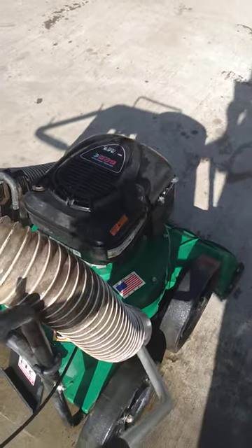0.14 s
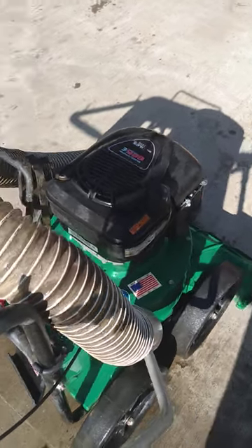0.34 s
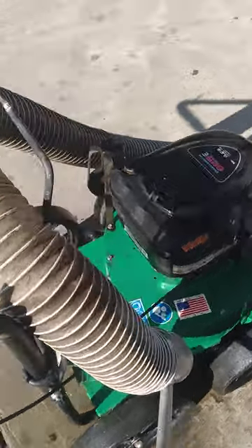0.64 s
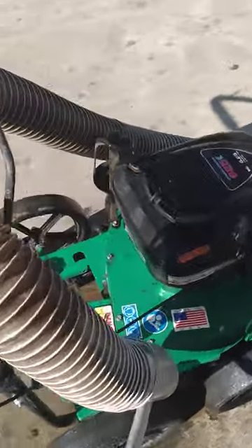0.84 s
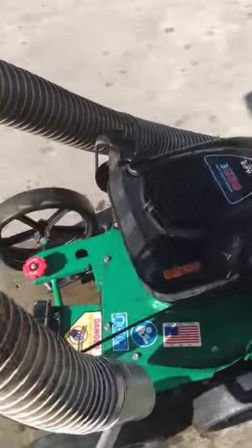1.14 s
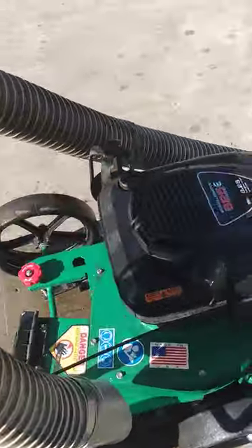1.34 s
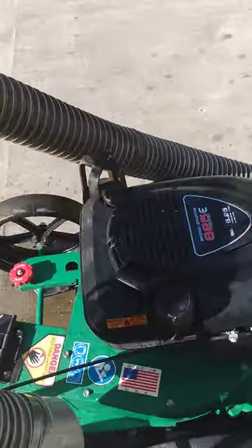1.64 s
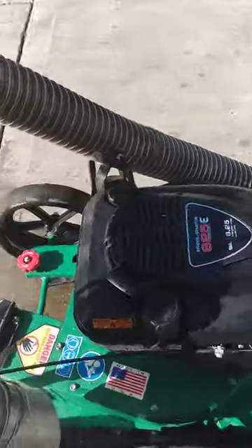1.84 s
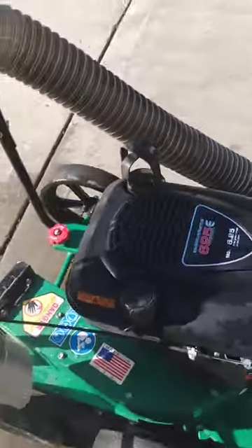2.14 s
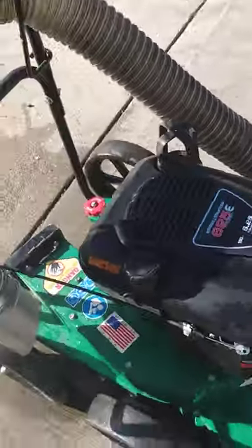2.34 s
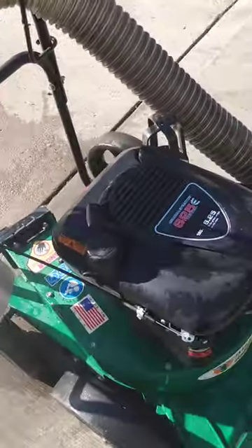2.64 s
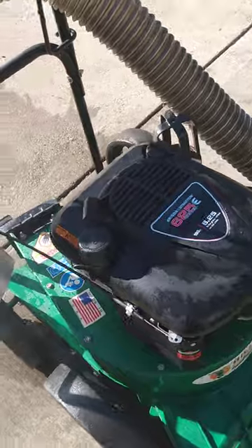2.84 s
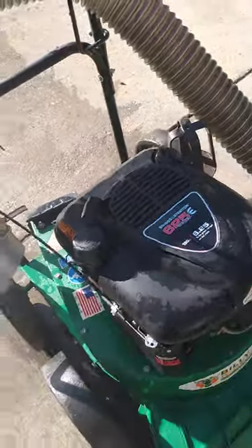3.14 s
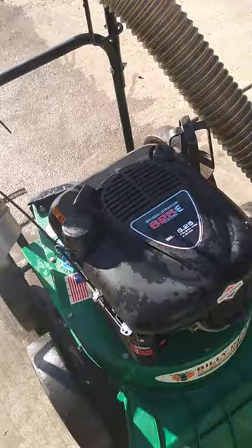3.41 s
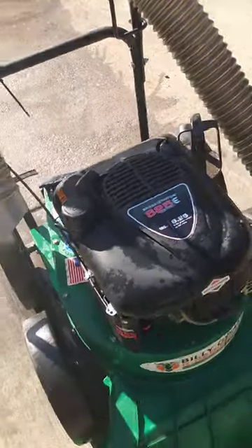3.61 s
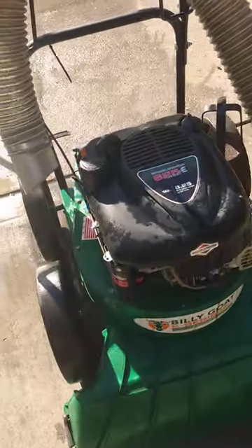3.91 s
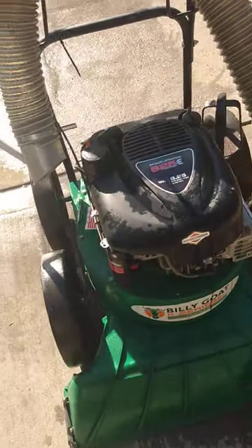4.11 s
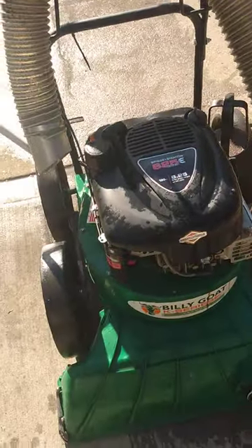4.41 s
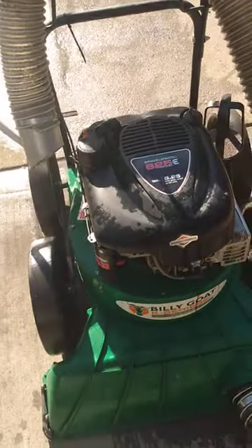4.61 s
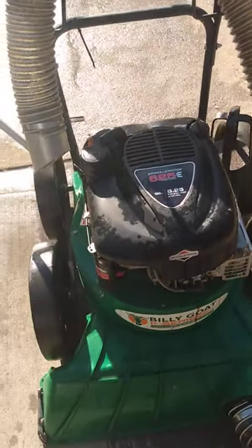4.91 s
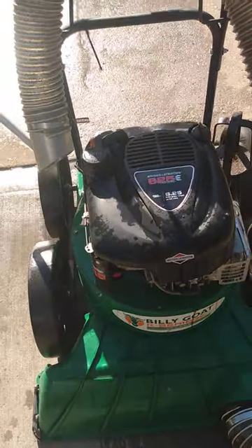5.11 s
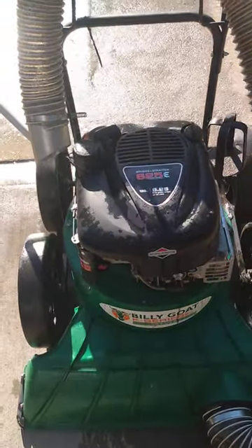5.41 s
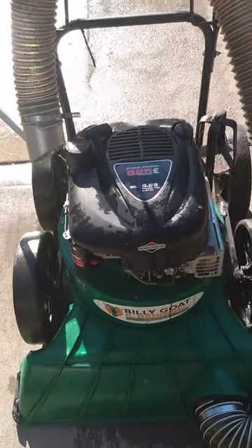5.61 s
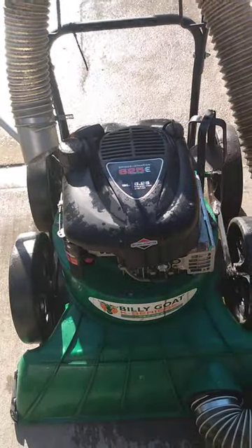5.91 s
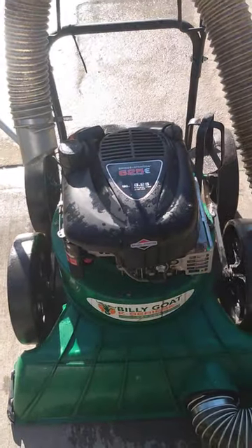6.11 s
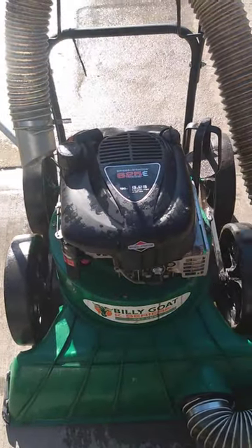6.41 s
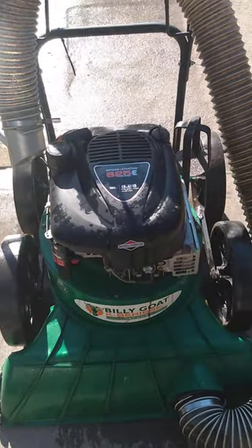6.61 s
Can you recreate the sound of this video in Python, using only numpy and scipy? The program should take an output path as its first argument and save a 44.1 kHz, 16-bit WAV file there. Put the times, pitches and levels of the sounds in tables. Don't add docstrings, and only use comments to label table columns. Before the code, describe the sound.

A leaf vacuum's small petrol engine, ignition just cut, coasts down very close by outdoors on concrete. From 0 s a low, wavering fan hum of nearly 190 Hz sits in rumble, housing roar and a broad airy hose rush, with valve thumps and short hisses at about 19 a second. Pitch, roar and pulse rate fall smoothly; around 1.7 s the airy valve sounds come nearer as the handheld microphone walks round, image slightly left. By 3 s the thumps separate, about nine a second. At 3.6 s a steel clack snaps with a dull pop and short rattle. Afterwards each cycle gives a hollow pop, crisp spit, chuff and brief frothy gurgle, with irregular low hose gulps, slowing from eight to about three a second by 6.7 s. The fan hum is nearly gone by then; faint steady yard hiss remains, the machine still turning at the end.

```python
import sys
import numpy as np
from scipy import signal
from scipy.fft import rfft, irfft
from scipy.io import wavfile
from scipy.ndimage import uniform_filter1d, map_coordinates

SR = 44100
rng = np.random.default_rng(int(sys.argv[2]) if len(sys.argv) > 2 else 0)


def waveform_to_disk(signal):
    frames = np.transpose(np.atleast_2d(signal))
    scaled = np.clip(frames, -1, 1) * 32767
    samples = np.round(scaled).astype(np.int16)
    wavfile.write(sys.argv[1], SR, samples)


def decibels_to_gain(level_db):
    exponent = np.asarray(level_db, float) / 20
    return 10 ** exponent


N = 297656
TIME_S = np.arange(N) / SR
RELEASE_S = 3.638

# [t/s, speed/rpm]
SPEED_RPM = [(0.0, 2269.0), (0.6, 1935.0), (1.2, 1687.0), (1.8, 1462.0), (2.4, 1275.0), (3.0, 1105.0),
             (3.6, 958.0), (4.2, 828.0), (4.8, 708.0), (5.4, 599.0), (6.0, 490.0), (6.75, 381.0)]
# [t/s, nearness to open side/dB, left over right/dB, left lag/us]
WALK = [(0, 1.5, 2.5, 20), (.3, .3, 2, 38.5), (.8, 2.4, 2.5, 52), (1.3, 2.5, 2, 65), (1.75, 9, 2, 83.5),
        (2.2, 8.5, 2.5, 102), (2.7, 8.5, 1.8, -110), (3.2, 7, 2, -110), (3.7, 7.5, 2.5, 38),
        (4.15, 4.5, 4, -30), (4.7, 5, 2.5, -21), (5.2, 5, 3, 11), (5.9, 5.5, 2.5, -20),
        (6.75, 6.5, 3.5, -46)]
# [f/Hz, level/dB]
HOSE_RUSH = [(900, -11), (1400, -1), (2000, 3), (2600, 0), (3100, -8.5), (4300, -15.5), (5500, -20.5),
             (8000, -26.5)]
# [f/Hz, width/Hz, level/dB]
SHELL_MODES = [(255, 25, -38), (320, 25, -39), (430, 20, -36), (495, 22, -34), (770, 40, -36),
               (1050, 40, -40)]


def unit(x):
    return x / np.sqrt(np.mean(x ** 2) + 1e-20)


def along(points, hz):
    f, v = np.transpose(points)
    return np.interp(np.log(hz + 1), np.log(f + 1), v)


def curves(rows):
    s, *cols = np.transpose(rows)
    return [np.interp(TIME_S, s, c) for c in cols]


def wobble(rate_hz):
    knots = rng.standard_normal(int(N * rate_hz / SR) + 4)
    return map_coordinates(knots, [np.arange(N) * rate_hz / SR])


def rush(gain, patchy_db=2.2):
    # [f/Hz, correlation]
    alike = [(40, 0.13), (70, 0.3), (150, 0.88), (380, 0.95), (950, 0.43), (2400, 0.11), (6000, 0.076),
             (15000, 0.083)]
    z = signal.stft(rng.standard_normal((2, N)), nperseg=512)[2]
    field = uniform_filter1d(rng.standard_normal(z.shape[1:]), size=5, axis=0)
    field = uniform_filter1d(field, size=6, axis=1)
    pair = signal.istft(z * decibels_to_gain(patchy_db * unit(field)), nperseg=512)[1][:, :N]
    hz = np.fft.rfftfreq(N, 1 / SR)
    turn = np.arccos(np.clip(along(alike, hz), -1, 1)) / 2
    mid, side = irfft(rfft(pair) * gain(hz) * [np.cos(turn), np.sin(turn)], N)
    return unit(np.array([mid + side, mid - side]))


def shaped(spectrum):
    below, above = (spectrum[0][0] / 2, -120), (spectrum[-1][0] * 2, -120)
    return lambda hz: decibels_to_gain(along([below, *spectrum, above], hz))


def peaks(modes, hz):
    return sum(decibels_to_gain(db) * w * hz / np.hypot(c * c - hz * hz, hz * w) for c, w, db in modes)


def cycle():
    start_cycles = -.2526
    return start_cycles + np.cumsum(curves(SPEED_RPM)[0]) / 120 / SR


def slowing():
    rpm, = curves(SPEED_RPM)
    speed_db = 20 * np.log10(rpm / rpm[0])
    return speed_db, np.minimum(speed_db - speed_db[round(RELEASE_S * SR)], 0)


def law(*names):
    # [full-speed level/dB, speed slope/(dB/dB), nearness slope/(dB/dB),
    # step at the snap/dB, added speed slope after it/(dB/dB)]
    laws = dict(rumble=(-31, 1.55, 0.66, -1.2, 0.17), roar=(-36, 1.33, 0.6435, -0.6, 0.1),
            hose=(-39, 1.43, 0.9752, 0.7, 0.24), hiss=(-54, 0.7, 1.08, 4.5, 1.8),
            exhaust=(-36, -0.46, 1.33, 2.6, 1.2), intake=(-38, -0.1, 1.26, -0.5, 3),
            puff=(-45.5, -0.04, 0.75, -1.5, 3), breath=(-50.5, 0.03, 0.12, .3, 2.1),
            deck=(-69, -0.17, 2.5, -0.8, 2.2), cowl=(-56, 1.4, 0.1, 3, -1.54))
    speed_db, since_db = slowing()
    drives = np.array([np.ones(N), speed_db, curves(WALK)[0], since_db < 0, since_db])
    return [np.dot(laws[name], drives) for name in names]


def stroke(turns, at, rise, fall, spread_db=1.2):
    u = (turns - at + .5) % 1 - .5
    size = decibels_to_gain(spread_db * rng.standard_normal(80))[np.floor(turns - at + 1.5).astype(int)]
    return size * np.exp(-.5 * (u / np.where(u < 0, rise, fall)) ** 2)


def passes(turns, at, db, spread_db=1.2):
    marks = np.zeros(N)
    where = np.flatnonzero(np.diff(np.floor(turns - at)))
    marks[where] = decibels_to_gain(db[where] + spread_db * rng.standard_normal(80)[:len(where)])
    return marks


def thump(marks, hz, cycles, lean_rad):
    t = np.arange(-1500, 1501) / SR
    swing = np.cos(2 * np.pi * hz * t + lean_rad) * np.exp(-.5 * (t * hz / cycles) ** 2)
    return signal.fftconvolve(marks, swing, "same")


def yard():
    # [f/Hz, level/dB]
    yard_hiss = [(1760, -32), (3000, -3), (4160, 0), (8140, -12), (11800, -10.5), (15100, -16),
                 (15900, -20)]
    return decibels_to_gain(-61.2) * rush(shaped(yard_hiss))


def panels():
    panel_hz = (758.5, 1051)
    sound = 0
    for hz, db in zip(panel_hz, law("deck", "cowl")):
        tone = np.sin(2 * np.pi * np.cumsum(hz + 6 * wobble(30)) / SR)
        sound = sound + np.sqrt(2) * decibels_to_gain(db + wobble(18)) * tone
    return sound


def gulps():
    # [t/s, level/dB, push 1 or pull -1]
    gulp_events = [(3.45, -28, 1), (3.588, -22, -1), (3.597, -20, 1), (4.122, -22, -1), (4.169, -23.5, 1),
                   (4.251, -23, 1), (4.259, -21.5, 1), (4.394, -24, 1), (4.726, -27, -1), (4.916, -25, 1),
                   (5.051, -34, 1), (5.075, -29, 1), (5.198, -29, 1), (5.911, -44, 1), (6.411, -27, 1),
                   (6.495, -30, -1), (6.528, -29, 1), (6.735, -34, -1)]
    s, db, way = np.transpose(gulp_events)
    marks = np.zeros(N)
    marks[np.round(s * SR).astype(int)] = decibels_to_gain(db) * np.sign(way)
    return thump(marks, hz=110, cycles=0.37, lean_rad=.4)


def clack():
    # [f/Hz, level/dB]
    crack_spectrum = [(240, -36), (400, -23), (752, -8.5), (1480, -9), (2280, 0), (3460, -12), (4290, -8.5),
                      (4780, -13.5), (5160, -16.5), (14700, -19), (15900, -25)]
    # [f/Hz, level/dB, t60/s]
    lever_modes = [(725, 6.5, 0.042), (2080, 0.5, 0.11), (2680, -17, 0.25), (4200, -7, 0.11),
                   (4670, -25, 5.0)]
    t = np.maximum(TIME_S - RELEASE_S, 0)
    start = 1 - np.exp(-t / 0.00052)
    ring = sum(decibels_to_gain(db - 60 * t / min(t60, .08)) * np.sin(2 * np.pi * hz * t) for hz, db, t60 in lever_modes)
    decay = decibels_to_gain(-17.0 - 60 * t / 0.039) + decibels_to_gain(-22.0 - 60 * t / 0.2)
    rattle_db = 2.4 * wobble(500)
    steel = rush(shaped(crack_spectrum), patchy_db=0) * decibels_to_gain([[1.2], [-1.2]] + rattle_db)
    mark = np.zeros(N)
    mark[round(3.631 * SR)] = decibels_to_gain(-15)
    return start * (decibels_to_gain(-21.5) * ring + decay * steel) + thump(mark, hz=180, cycles=0.36, lean_rad=1.1)


def gurgle(turns, level_db):
    # [f/Hz, wander/Hz, level/dB]
    throat = [(400, 22, -4), (805, 35, 0)]
    froth = .4
    sound = 0
    for (hz, wander_hz, db), at, fall in zip(throat, (.765, .725), (.07, .04)):
        phase = 2 * np.pi * np.cumsum(hz + wander_hz * wobble(120)) / SR
        bubbles = rush(lambda f: peaks([(hz, 220, 0)], f) ** 2, patchy_db=0)
        voice = (1 - froth / 2) * np.sin(phase) + froth * bubbles
        swell = stroke(turns, at, 0.019, fall, spread_db=0)
        sound = sound + decibels_to_gain(level_db + db + 3.5 + 2.2 * wobble(200)) * swell * voice
    return sound


def release(turns):
    # [level at the snap/dB, speed slope/(dB/dB), offset until the lifter seats/dB]
    open_laws = dict(pop=(-22, .45, 3.5), spit=(-30.5, 2.92, -9.5), chuff=(-34.5, 1.54, -6),
                 gurgle=(-35, 0.6, -14.5))
    # [f/Hz, level/dB]
    spit_spectrum = [(600, 1.5), (1300, 2.5), (2200, -11), (3200, -3.5), (4800, -2), (7000, -12.5),
                     (12000, -13), (16000, -17)]
    seat_s = .55
    seating = np.exp(-abs(TIME_S - RELEASE_S) / seat_s)
    since_db = slowing()[1]
    levels = [db + slope * since_db + lack_db * seating for db, slope, lack_db in open_laws.values()]
    pop_db, spit_db, chuff_db, gurgle_db = levels
    on = TIME_S > RELEASE_S + .06
    marks = passes(turns, .538, pop_db, spread_db=0) * on
    pop = thump(marks, hz=169.0, cycles=0.48, lean_rad=1.5)
    echo = thump(marks, hz=103, cycles=0.68, lean_rad=0.47)
    pop += 0.29 * np.roll(echo, round(0.0103 * SR))
    spit = stroke(turns, 0.526, 0.017, 0.034, spread_db=0)
    spit += 0.29 * stroke(turns, 0.532, 0.042, 0.22, spread_db=0)
    spit *= decibels_to_gain(spit_db + 3.5 + 2.7 * wobble(420))
    chuff = decibels_to_gain(chuff_db + 2.5 * wobble(180)) * stroke(turns, 0.54, rise=.085, fall=.075)
    air = spit * rush(shaped(spit_spectrum), patchy_db=1.0) + chuff * rush(shaped(HOSE_RUSH))
    return pop + on * (air + gurgle(turns, gurgle_db))


def valves(turns):
    # [f/Hz, level/dB]
    puff_spectrum = [(3500, 4.5), (5000, 3.5), (6000, -0.5), (8000, -2.5), (11000, -2.5), (13500, -4.5),
                     (15800, -11)]
    # [f/Hz, level/dB]
    breath_spectrum = [(3500, -2), (5000, 2), (7500, -6.5), (9500, -1), (10800, 0.5), (12500, -1.5),
                       (15800, -3.5)]
    out_db, in_db, puff_db, breath_db = law("exhaust", "intake", "puff", "breath")
    cycles_hz = np.gradient(turns) * SR
    exhaust = thump(passes(turns, .797, out_db), hz=94.6, cycles=0.35, lean_rad=-.35)
    exhaust = np.roll(exhaust, round(.0105 * SR))
    intake = thump(passes(turns, 0.1313, in_db), hz=128, cycles=0.58, lean_rad=1.1)
    short = 0.015 + 0.0024 * cycles_hz
    puff = decibels_to_gain(puff_db) * stroke(turns, 0.011, short, 1.55 * short)
    breath = stroke(turns, 0.22, 0.046, 0.15)
    breath += .5 * stroke(turns, .39, 0.01, .015)
    breath += 0.23 * stroke(turns, 1.0, .015, 0.075)
    breath += .42 * np.sqrt(cycles_hz / 19)
    breath *= decibels_to_gain(breath_db + .7 * wobble(200))
    return exhaust + intake + puff * rush(shaped(puff_spectrum)) + breath * rush(shaped(breath_spectrum))


def hose_colour(hz):
    # [f/Hz, width/Hz, level over the rush/dB]
    pipe_modes = [(1980, 23, -8), (2550, 48, -23), (4220, 87, 3.5)]
    return shaped(HOSE_RUSH)(hz) * (1 + .5 * peaks(pipe_modes, hz))


def draught(turns):
    # [f/Hz, level/dB]
    rumble_spectrum = [(15, -44), (25, -23), (59, -2.5), (86, -8), (157, -3), (267, -7), (408, -10.5),
                       (454, -14.5), (600, -22.5), (780, -37), (1320, -120)]
    # [f/Hz, level/dB]
    housing_roar = [(250, -14), (400, -11.5), (500, -4), (600, -3), (800, -2), (1050, -5), (1400, -13),
                    (2200, -31)]
    # [f/Hz, level/dB]
    hiss_spectrum = [(1760, -21), (3000, 13), (4340, 12), (5100, 2), (5510, -22), (6600, -13), (10500, -10),
                     (13300, -25.5), (15900, -33)]
    rumble_db, roar_db, hose_db, hiss_db = law("rumble", "roar", "hose", "hiss")
    eddy = wobble(35)
    beat = np.cos(2 * np.pi * (turns - .1))
    chug_db = 4 * np.cos(2 * np.pi * (turns - .97))

    rumble_db = rumble_db + 3.5 + .65 * chug_db + 1.5 * wobble(45)
    rumble_db += 0.91 * np.cos(2 * np.pi * (2 * turns - .1))
    rumble = decibels_to_gain(rumble_db) * rush(shaped(rumble_spectrum), patchy_db=0)

    deck_db = -37.5 - 1.1 * TIME_S + 2.5 * wobble(11) + chug_db
    deck = decibels_to_gain(deck_db) * rush(lambda f: peaks([(62, 38, 0)], f) ** 2, patchy_db=0.8)

    roar_db = roar_db + 1.5 + 1.88 * eddy + 1.3 * np.cos(2 * np.pi * (2 * turns - .4))
    roar_gain = lambda f: shaped(housing_roar)(f) * (1 + decibels_to_gain(26.5) * peaks(SHELL_MODES, f))
    roar = decibels_to_gain(roar_db) * rush(roar_gain, patchy_db=0.43)

    hose_db = hose_db + 0.5 + 0.61 * eddy + 1.44 * wobble(150) + 0.21 * beat
    hose = decibels_to_gain(hose_db) * rush(hose_colour, patchy_db=1.0)
    return rumble + deck + roar + hose + decibels_to_gain(hiss_db - 4.0) * rush(shaped(hiss_spectrum))


def fan_hum(turns):
    # [f/Hz, level/dB]
    outlet = [(32, -72), (80, -36.5), (92, -51), (106, -26.5), (122, -20.5), (140, -13.5), (153, -14.5),
              (178, -12.5)]
    # [multiple of the cycle rate, level/dB]
    shaft_orders = [(3, -45.5), (4, -53), (6, -39), (7, -36.5), (8, -45.5), (11, -42.5), (14, -63)]
    cycles_hz = np.gradient(turns) * SR
    lag_rad = -3.2 + 1.14 * TIME_S + 0.044 * wobble(29.0)
    blade_db = along(outlet, 10 * cycles_hz) + 0.27 * wobble(7.2)
    hum = np.sqrt(2) * decibels_to_gain(blade_db) * np.cos(2 * np.pi * 10 * turns + lag_rad)
    for k, db in shaft_orders:
        level = np.sqrt(2) * decibels_to_gain(db - 16 / k * TIME_S + 5.6 * wobble(2.87))
        hum += level * np.cos(2 * np.pi * k * turns + 2.0 * wobble(1.55))
    for k in (20, 30, 40):
        level = peaks(SHELL_MODES, k * cycles_hz) ** 2
        level *= decibels_to_gain(31 - .9 * TIME_S ** 2 + 1.7 * wobble(7.36))
        hum += level * np.cos(2 * np.pi * k * turns + 0.43 * wobble(7.7))
    return hum


def scene():
    turns = cycle()
    _, pan_db, lag_us = curves(WALK)
    machine = panels() + gulps() + clack() + release(turns) + valves(turns) + draught(turns) + fan_hum(turns)
    left, right = machine * decibels_to_gain([pan_db / 2, -pan_db / 2])
    ahead = lag_us * SR / 1e6
    return np.array([left, map_coordinates(right, [np.arange(N) + ahead], order=5)]) + yard()


def band_limit(x):
    return signal.sosfilt(signal.butter(12, 16050, fs=SR, output="sos"), x)


def record(dry):
    hz = np.fft.rfftfreq(N, 1 / SR)
    bass_cut = hz ** 4 / np.hypot(hz ** 4, 50.0 ** 4)
    mix = irfft(rfft(dry) * (hz < 15870) * bass_cut, N)
    return band_limit(mix)


dry = scene()
out = record(dry)
waveform_to_disk(out)
```